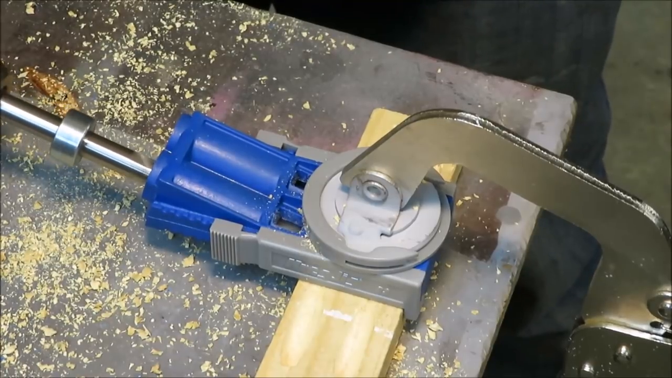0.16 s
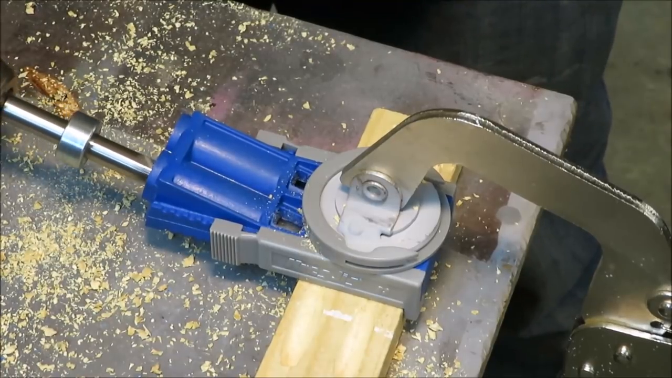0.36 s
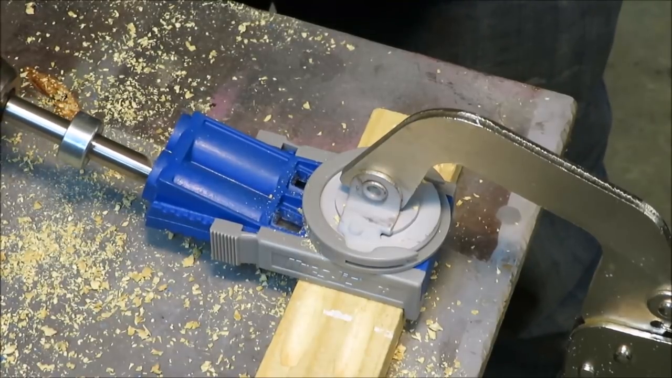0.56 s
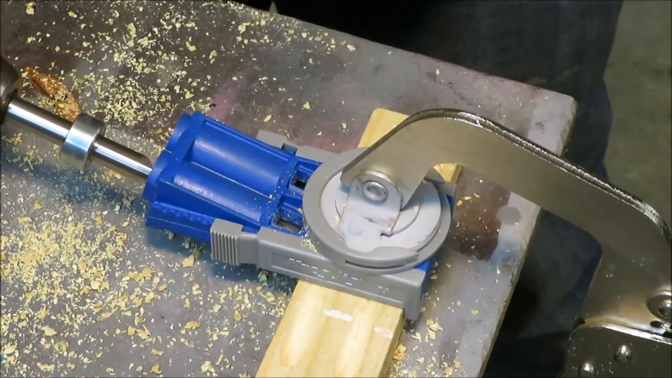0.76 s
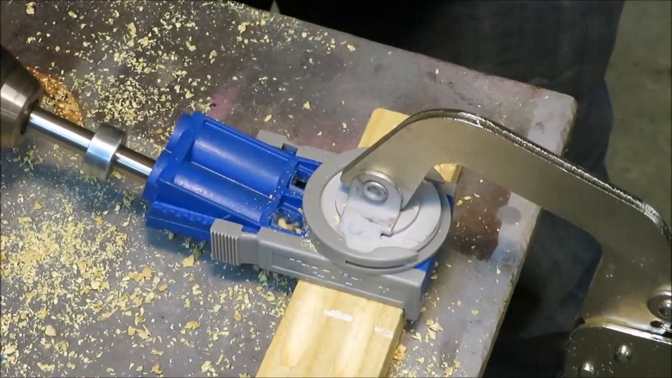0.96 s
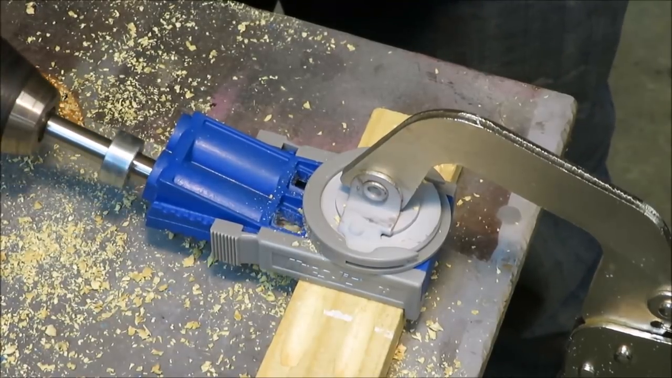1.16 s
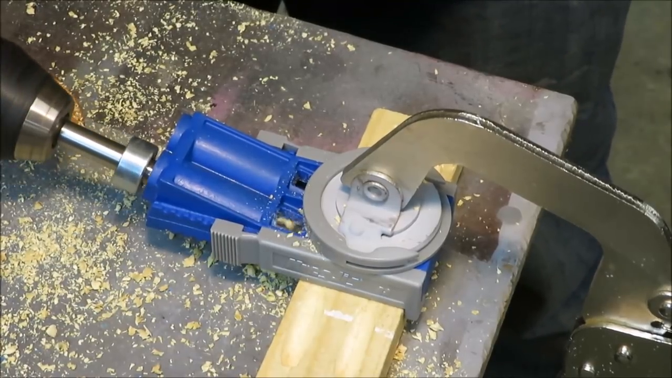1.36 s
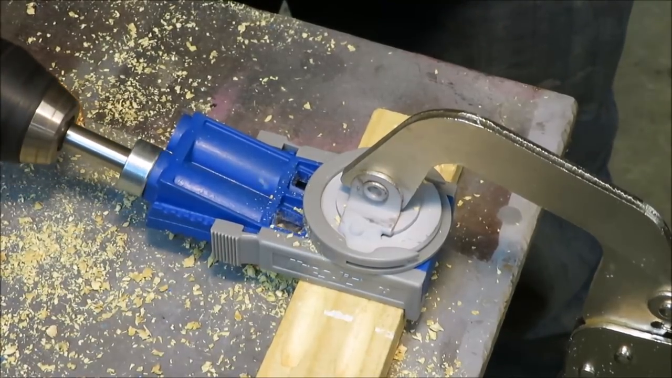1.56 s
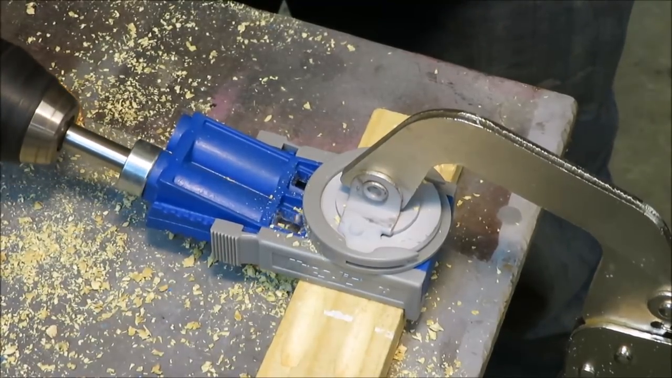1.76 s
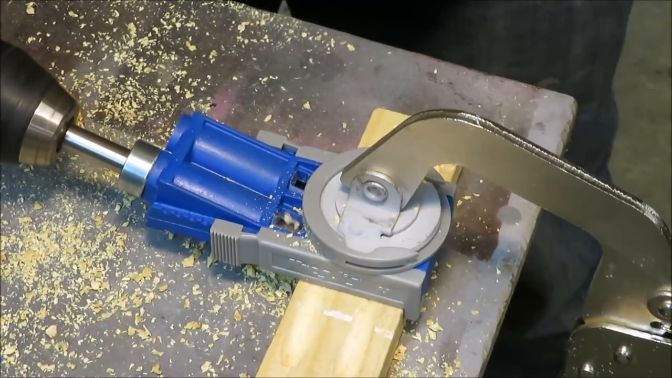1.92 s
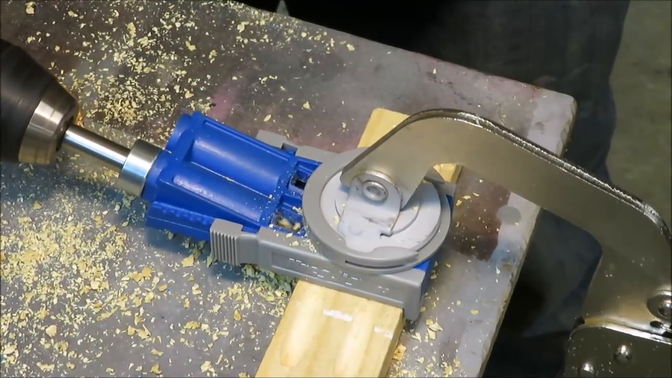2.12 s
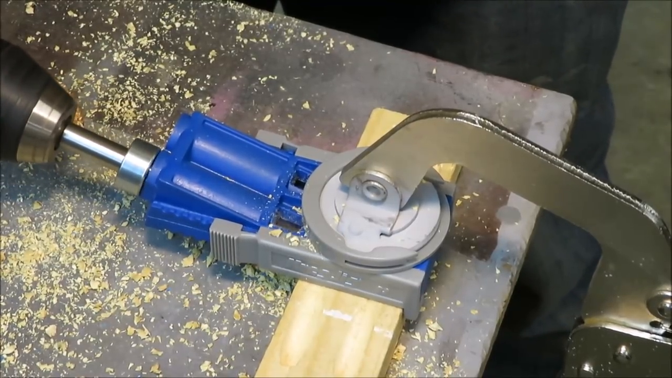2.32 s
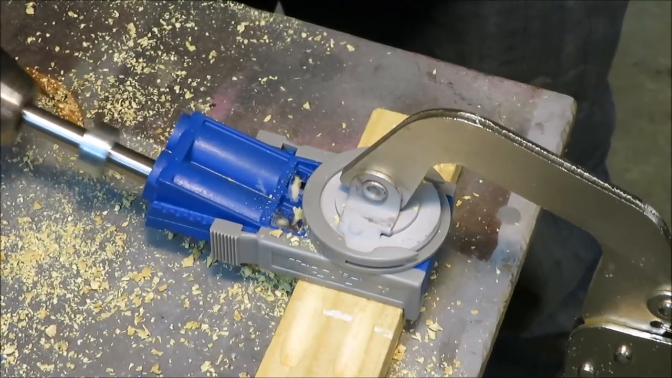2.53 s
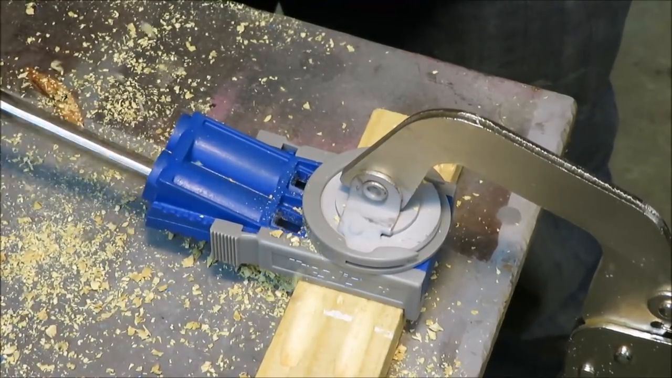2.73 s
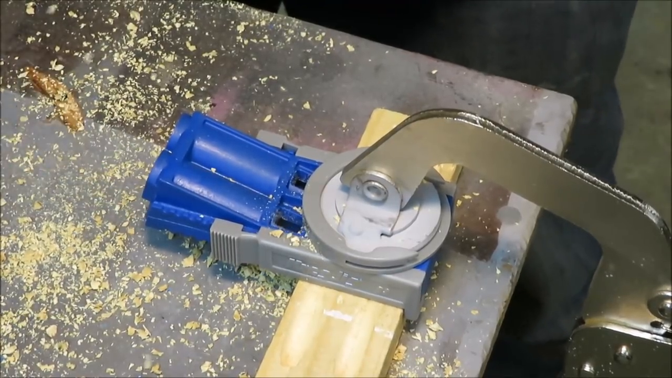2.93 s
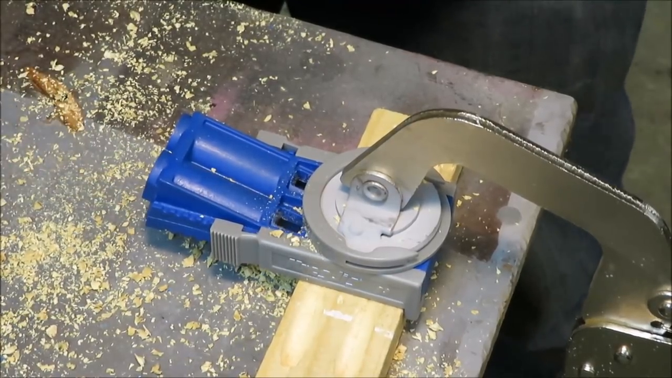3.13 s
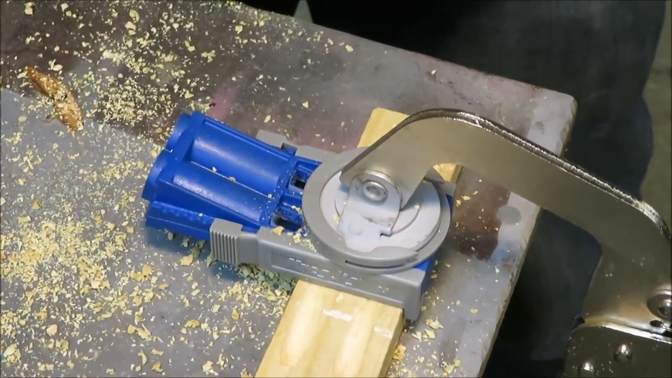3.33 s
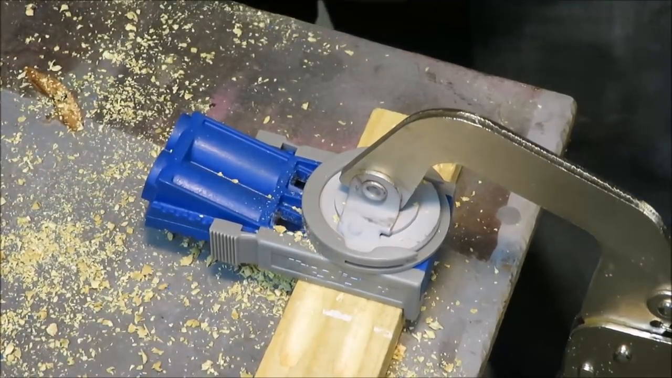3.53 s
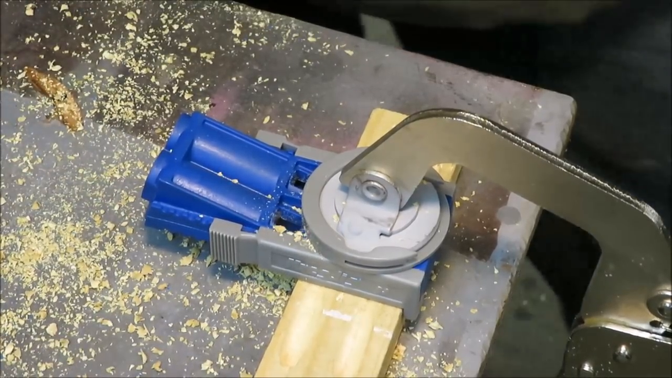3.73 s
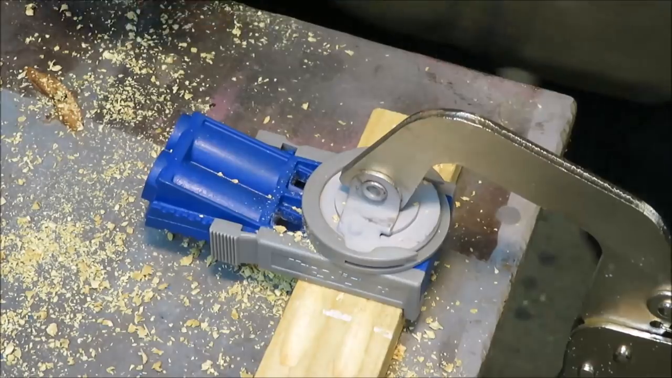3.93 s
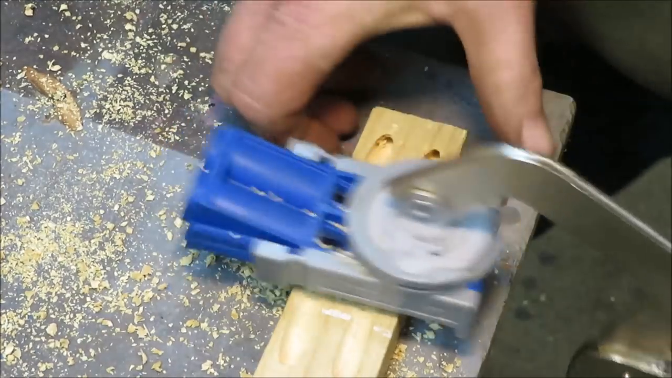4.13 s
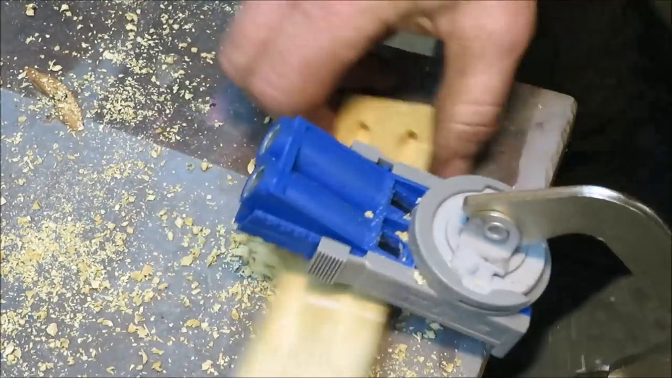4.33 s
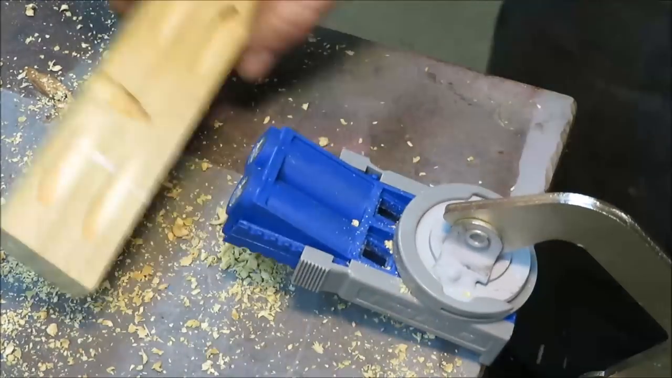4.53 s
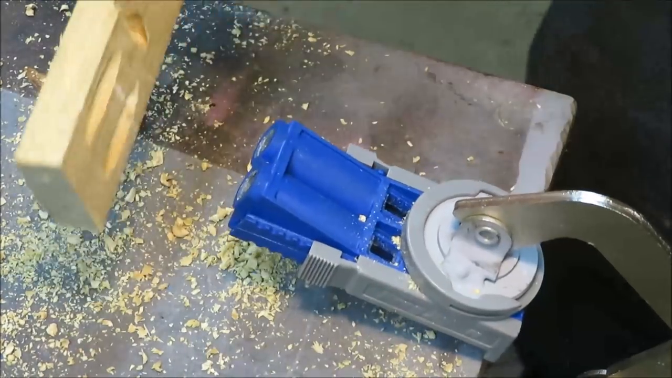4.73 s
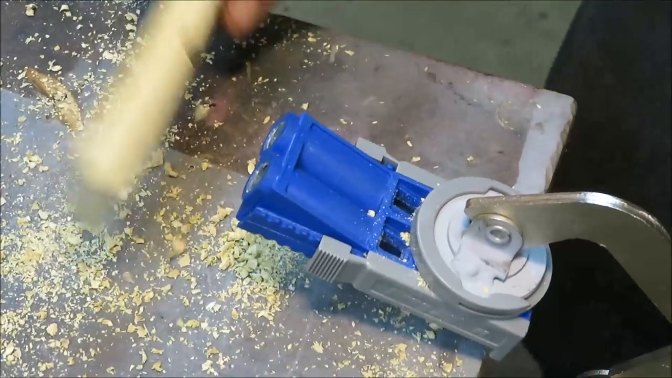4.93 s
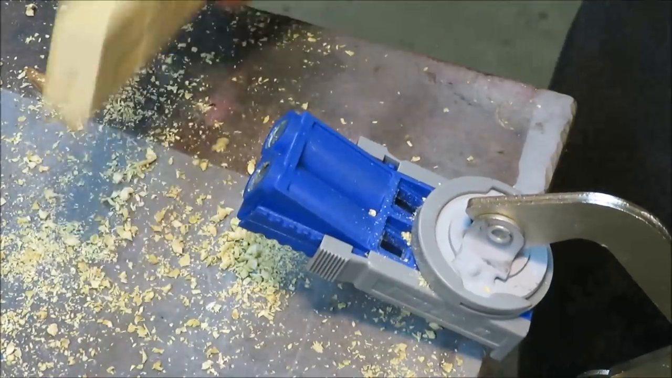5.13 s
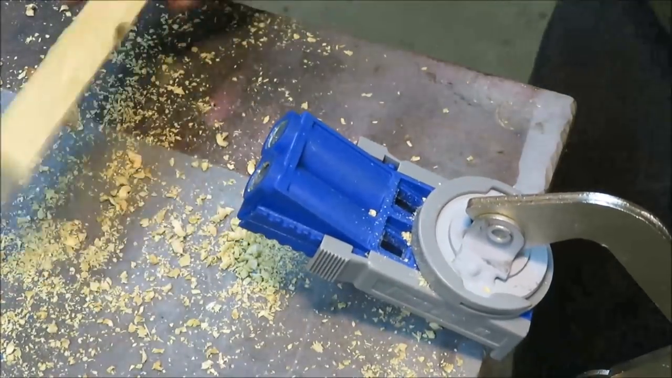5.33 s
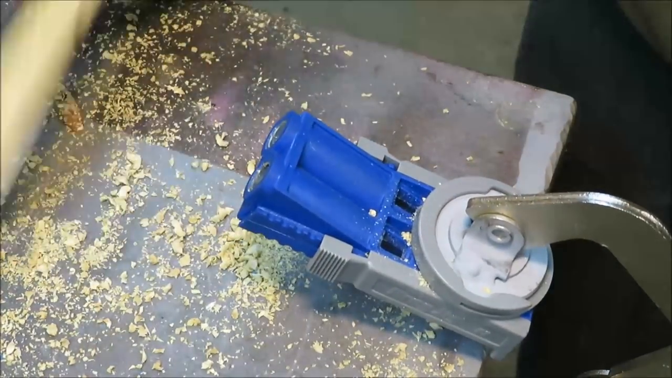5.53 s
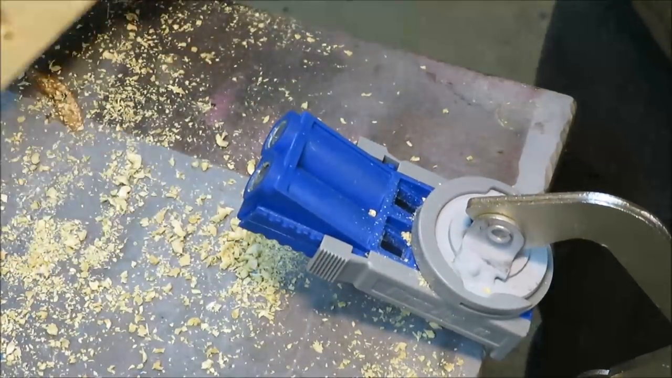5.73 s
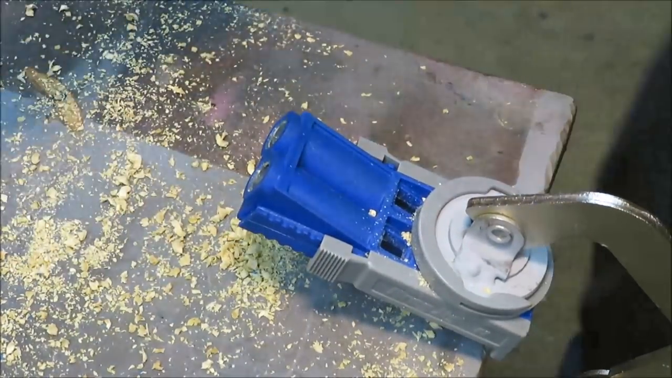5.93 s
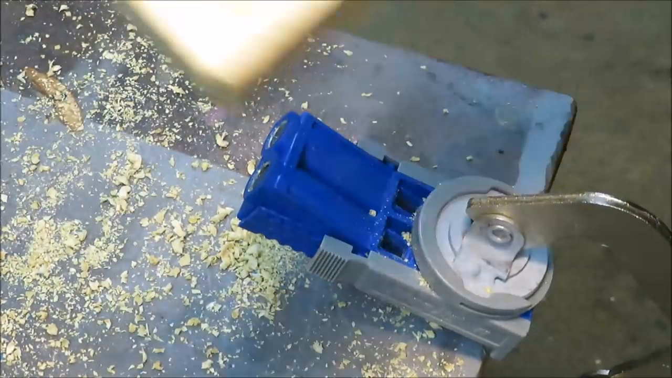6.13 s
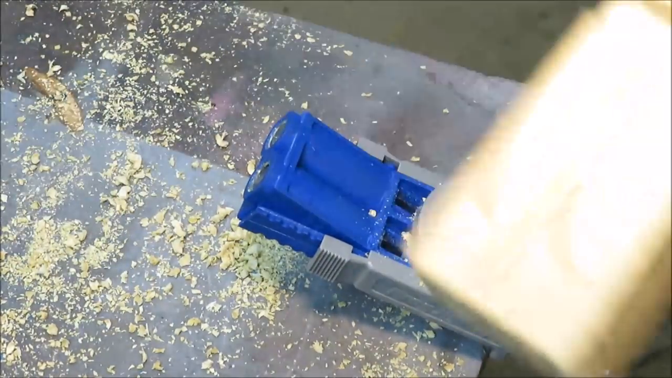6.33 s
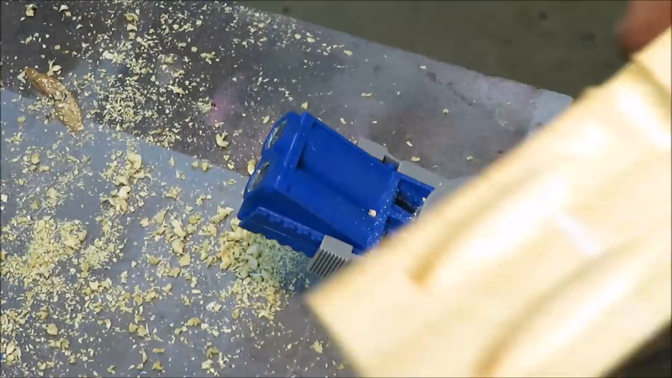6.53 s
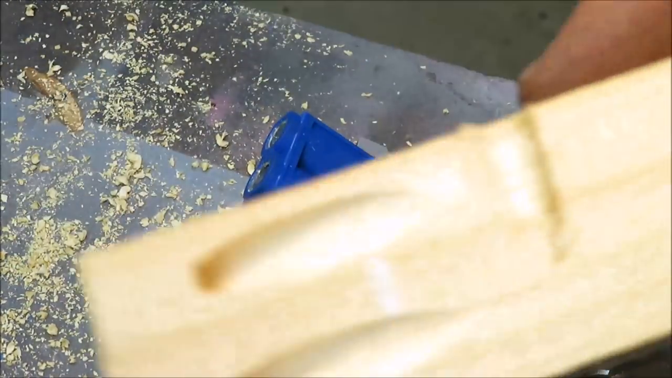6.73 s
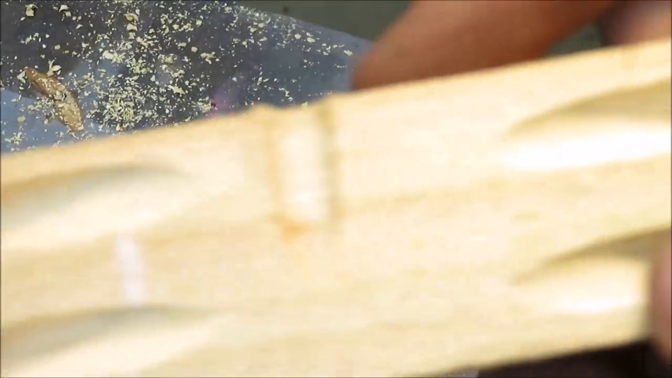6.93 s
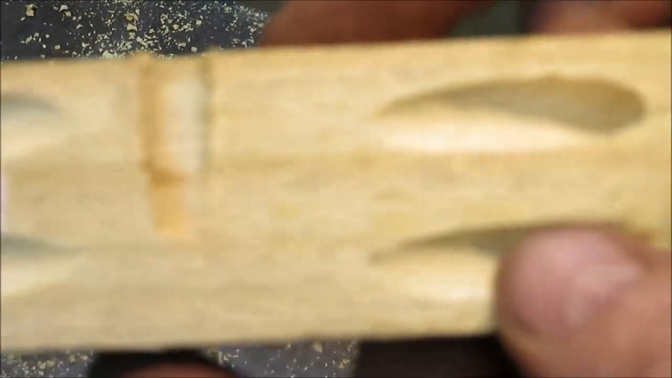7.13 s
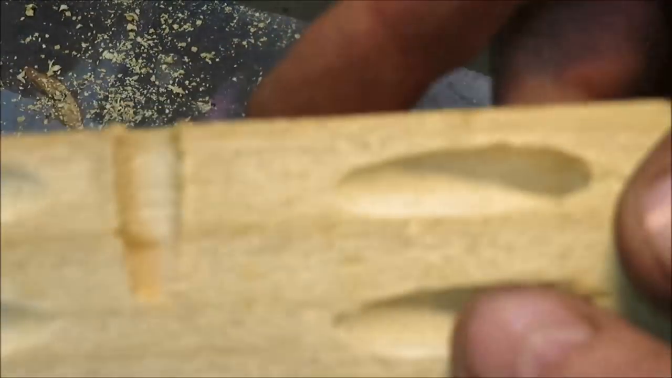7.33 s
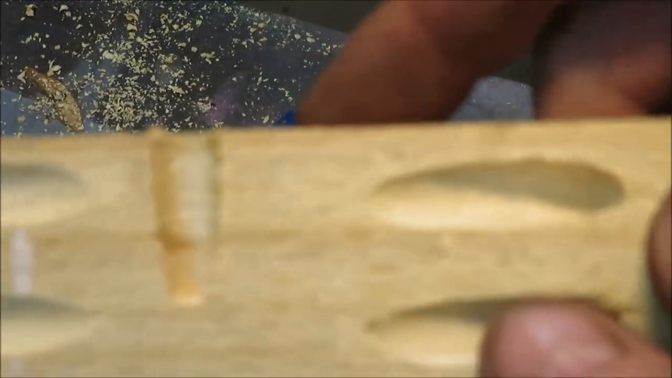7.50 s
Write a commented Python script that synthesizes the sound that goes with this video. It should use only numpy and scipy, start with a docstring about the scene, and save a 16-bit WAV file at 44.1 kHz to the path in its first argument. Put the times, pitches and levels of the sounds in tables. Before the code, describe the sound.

In a workshop, a cordless drill already running bores into a clamped board, its whine sagging under load with rough wood tearing, then recovering and braking with a hard clack. The drill thumps onto the bench, a clamp snaps open with plastic clatter, the board knocks six times, and fingers softly stroke it. Close stereo microphones, modest room echo.

```python
"""Workshop, close pair of microphones: a cordless drill bores a pocket hole through a clamped jig, bogs down
in the wood, backs out and brakes with a clack. It is set down on the bench, the clamp snaps open, the board
is knocked six times to shed its chips, then turned over in the hands. The motor is tones locked to a shaft
angle plus coloured noise and grains; blows ring decaying modes under short noise cracks; friction is
coloured grains under gesture envelopes. A synthetic diffuse echo surrounds the sources."""
import sys
import numpy as np
from scipy import signal
from scipy.fft import rfft, irfft
from scipy.io import wavfile
from scipy.ndimage import uniform_filter1d

SR = 44100
rng = np.random.default_rng(int(sys.argv[2]) if len(sys.argv) > 2 else 0)


def digitize_waveform(pressure):
    """Quantize a signal to 16-bit integers and store it at the path in sys.argv[1].

    Rows of a 2-D input are taken as channels; values are limited to [-1, 1].
    """
    field = np.atleast_2d(pressure).T
    bounded = np.clip(field, -1, 1)
    quanta = np.round(bounded * 32767).astype(np.int16)
    wavfile.write(sys.argv[1], SR, quanta)


N = 333524
TIME_S = np.arange(N) / SR


def undb(db):
    """Convert decibels to amplitude gain."""
    return 10 ** (np.asarray(db) / 20)


def unit(x):
    """Scale to rms 1."""
    return x / np.sqrt(np.mean(x ** 2))


def curve(rows):
    """Interpolate (s, value) rows at every sample."""
    return np.interp(TIME_S, *np.transpose(rows))


def across(points, hz):
    """Interpolate (Hz, value) points on a logarithmic frequency axis."""
    point_hz, value = np.transpose(points)
    return np.interp(np.log(hz + 1), np.log(point_hz + 1), value)


def colour(x, points):
    """Filter by a (Hz, dB) spectrum with zero phase."""
    gain = undb(across(points, np.fft.rfftfreq(len(x), 1 / SR)))
    return irfft(rfft(x) * gain, len(x))


def walk(rate_hz):
    """Random levels, each held 1 / rate_hz, smoothed twice, rms 1."""
    hold = max(int(SR / rate_hz), 2)
    steps = np.repeat(rng.standard_normal(N // hold + 1), hold)
    slewed = uniform_filter1d(uniform_filter1d(steps, hold), hold)
    return unit(slewed[:N])


def grains(rate_hz, spread_db):
    """Tiny clicks at random moments, a few far stronger than the rest, rms 1."""
    hits = rng.random(N) < rate_hz / SR
    strength = rng.standard_normal(N) * undb(spread_db * rng.exponential(size=N))
    return unit(hits * strength)


def gesture(start_s, length_s, attack_s, release_s):
    """Envelope of one movement: linear rise, hold at 1, exponential decay."""
    age_s = TIME_S - start_s
    return np.clip(age_s / attack_s, 0, 1) * np.exp(-np.maximum(age_s - length_s, 0) / release_s)


def after(moment_s, change_s=0.03):
    """Smooth change from 0 to 1 around a moment."""
    return .5 + .5 * np.tanh((TIME_S - moment_s) / change_s)


def resonate(x, resonances):
    """Sum of parallel resonant band-passes, given as (Hz, width Hz, dB)."""
    return sum(undb(db) * signal.lfilter(*signal.iirpeak(hz, hz / width_hz, fs=SR), x)
               for hz, width_hz, db in resonances)


def strike(blows, modes, crack_colour, ring_db, crack_db, crack_s, dense=.5, dense_s=.006, scatter_db=5.0):
    """Each blow rings an object's modes and adds a short crack; softer contact excites high modes less."""
    out, t = np.zeros(N + SR), TIME_S[:SR // 2]
    hz, db, t60_s = np.transpose(modes)
    # slow motion hardly radiates
    radiation = signal.butter(2, hz[0] / np.sqrt(2), "high", fs=SR, output="sos")
    decay = np.exp(-np.log(1000) * np.outer(1 / t60_s, t))
    sign = (-1) ** np.arange(len(hz))  # neighbouring modes swing in opposite directions
    fill = rng.standard_normal(len(t))  # the object's own weak modes, same for every blow
    for start_s, blow_db, tick_db, contact_hz in blows:
        scattered_db = db + scatter_db * rng.standard_normal(len(hz))
        gain = undb(scattered_db) / (1 + (hz / contact_hz) ** 2)
        gain = gain / np.linalg.norm(gain)
        pitch_hz = hz * (1 + .008 * rng.standard_normal(len(hz)))
        ring = (gain * sign) @ (np.sin(2 * np.pi * np.outer(pitch_hz, t)) * decay)
        # many weak, well-damped modes fill the gaps between the strong ones
        outline_hz = np.r_[hz[0] / 2, hz, 2 * hz[-1]]
        outline_db = 20 * np.log10(np.r_[.01, gain, .003])
        weak_modes = unit(colour(fill, np.c_[outline_hz, outline_db]))
        onset = 1 - np.exp(-2 * contact_hz * t)
        ring += dense * weak_modes * np.exp(-t / dense_s) * onset
        crack = unit(colour(rng.standard_normal(len(t)), crack_colour)) * np.exp(-t / crack_s)
        blow = undb(blow_db + ring_db) * ring + undb(tick_db + crack_db) * crack
        start = int(start_s * SR)
        out[start:start + len(t)] += signal.sosfilt(radiation, blow)
    return out[:N]


# Spectrum of the workshop air and sleeves. Each row: frequency in Hz, relative level in dB.
AIR_COLOUR_DB = [(20, -30.5), (60, -8), (140, -3.5), (330, -2), (580, -8), (900, -11), (2200, -14.5),
                 (4000, -24), (9000, -34), (15000, -41)]
# Width of diffuse sound. Each row: frequency in Hz, side minus mid in dB.
ROOM_SIDE_DB = [(200, -33), (700, -21), (2200, -17), (3200, -12), (4700, -3), (9000, 0)]
# Sleeves rustle while the arms move. Each row: start in seconds, length in seconds, level in dB.
ARM_MOVES = [(3.287, 2.3, -48.5), (6.823, 2, -48.5)]


def background(air_db=-59, attack_s=0.77, release_s=0.22):
    """Quiet workshop air as coloured noise, raised to a soft low rustle by moving sleeves."""
    mid, side = (unit(colour(rng.standard_normal(N), AIR_COLOUR_DB)) for _ in range(2))
    side = colour(side, ROOM_SIDE_DB)
    sleeves = sum(undb(db) * gesture(start_s, length_s, attack_s, release_s)
                  for start_s, length_s, db in ARM_MOVES)
    level = np.hypot(undb(air_db), sleeves) * undb(0.72 * walk(9.9))
    return np.array([mid + side, mid - side]) * level


def drill(stop_s=2.897, fade_s=0.0047):
    """Whine, boring noise and shudder share one shaft and end together when the brake bites."""
    angle = motor_angle()
    running = np.clip((stop_s - TIME_S) / fade_s + 1, 0, 1)
    return running * whine(angle), running * boring(angle), running * shudder(angle)


# Motor speed, sagging under the push and recovering on backing out.
# Each row: time in seconds, speed in Hz (turns per second).
SPEED_HZ = [(0.0, 322.8), (0.26, 321.8), (0.44, 320), (0.76, 319.5), (0.86, 319.4), (0.94, 308.8),
            (1.08, 303.6), (1.16, 306.9), (1.24, 286.2), (1.28, 289), (1.34, 300.7), (1.52, 292.8),
            (1.62, 306.6), (1.8, 311.8), (2.6, 318.5), (2.78, 325.7), (2.88, 319)]


def motor_angle():
    """Shaft angle in radians: integral of the loaded speed with slight wobble and flutter."""
    hz = curve(SPEED_HZ) * (1 + .0016 * walk(30) + .0022 * walk(300))
    return 2 * np.pi * np.cumsum(hz) / SR


def sag_hz(free_hz=325):
    """Load on the motor, as the speed that it loses."""
    return free_hz - curve(SPEED_HZ)


def feed(start_s=.17, end_s=1.62):
    """1 while the bit is pushed into the wood, until its collar meets the jig; 0 before and after."""
    return after(start_s) - after(end_s)


# Tones of fan, commutator and gears.
# Each row: multiple of motor speed [1], relative level in dB, change while the bit is pushed in dB.
MOTOR_ORDERS = [(1, -44, 0), (1.305, -34.5, -.5), (2, -40, 0), (3, -39, -1.5), (4, -41, -1.5),
                (5, -27.5, -2.5), (6.53, -35.5, -8), (9.79, -42, -2), (12, -38.5, -5.5), (12.58, -42, -2),
                (12.73, -44, -2), (22, -42, -6), (25, -43, 0), (27, -46, -2), (30, -44, -2),
                (32, -42.5, -2), (35, -45.5, -2)]
# Housing resonances that lift passing tones. Each row: centre in Hz, half width in Hz, lift in dB.
HOUSING = [(3830, 140, 7.5), (7400, 350, 8)]


def housing_lift_db(tone_hz):
    """Gain of a tone gliding through the housing resonances."""
    return sum(db / (1 + ((tone_hz - hz) / half_width_hz) ** 2) for hz, half_width_hz, db in HOUSING)


def whine(angle, free_db=1.06, db_per_sag_hz=0.0157, waver_db=2.0, buzz_db=-40):
    """Motor tones locked to the shaft; the brushes scrape the same uneven track on every turn."""
    speed_hz, pushed = curve(SPEED_HZ), feed()
    tones = np.zeros(N)
    for order, db, push_db in MOTOR_ORDERS:
        level_db = db + housing_lift_db(order * speed_hz) + push_db * pushed + waver_db * walk(25.42)
        tones += undb(level_db) * np.sqrt(2) * np.sin(order * angle + 2 * np.pi * rng.random())
    track = signal.resample(rng.standard_normal(96), 1024)
    track_angle = np.linspace(0, 2 * np.pi, len(track), endpoint=False)
    buzz = unit(np.interp(angle, track_angle, track, period=2 * np.pi))
    return undb(free_db + db_per_sag_hz * sag_hz()) * tones + undb(buzz_db) * buzz


# Flutes catch on fibres and chips.
# Each row: start in seconds, length in seconds, extra cutting level in dB.
CATCHES = [(0.324, 0.16, 4), (0.829, 0.26, 3), (1.155, 0.052, 5), (2.611, 0.06, 7)]


def catch_db():
    """Extra cutting level while the flutes catch."""
    return sum(db * gesture(start_s, length_s, attack_s=.015, release_s=.015)
               for start_s, length_s, db in CATCHES)


# Spectrum of torn wood fibres. Each row: frequency in Hz, relative level in dB.
CUT_COLOUR_DB = [(30, -40.5), (55, -29), (80, -9), (150, -3), (280, -2.5), (400, 2), (520, -2), (700, -2),
                 (900, -1.5), (1100, -8.5), (1500, -10), (2500, -10), (6000, -22)]
# Spectrum of brush and fan hiss. Each row: frequency in Hz, relative level in dB.
RUSH_COLOUR_DB = [(500, -26), (1200, -1.5), (1700, 4.5), (2100, 4.5), (2400, -2), (3100, 3), (3500, -2),
                  (4050, 6), (4900, -2.5), (6500, -3), (7400, -0.5), (10300, -1), (13000, -3.5),
                  (15500, -15)]
GEAR_RATIO = 14  # motor turns per chuck turn
# Levels at the free speed, and their change per Hz of sag.
CUT_FREE_DB, CUT_DB_PER_SAG_HZ = -25.5, 0.0741
RUSH_FREE_DB, RUSH_DB_PER_SAG_HZ = -19, -0.0555
BIT_OUT_S, BIT_OUT_DB = 2.62, -2.5  # bit slips out of the guide, hiss drops


def boring(angle, brush_depth=0.17, bite_depth=0.2):
    """Brush and fan hiss pulses with each motor turn; flutes tear fibres as grains, harder under load."""
    pulse = (1 + brush_depth * np.sin(angle)) * undb(1.0 * walk(90))
    rush = unit(colour(rng.standard_normal(N) * pulse, RUSH_COLOUR_DB))
    bite = 1 + bite_depth * np.sin(2 * angle / GEAR_RATIO)  # two flutes per chuck turn
    cutting = unit(colour(grains(7000, 1.6) * bite * undb(0.56 * walk(35.005)), CUT_COLOUR_DB))
    cut_db = CUT_FREE_DB + CUT_DB_PER_SAG_HZ * sag_hz() + catch_db()
    rush_db = RUSH_FREE_DB + RUSH_DB_PER_SAG_HZ * sag_hz() + BIT_OUT_DB * after(BIT_OUT_S)
    return undb(rush_db) * rush + undb(cut_db) * cutting


# Resonances of the clamped board. Each row: centre in Hz, width in Hz, relative level in dB.
SHUDDER = [(238.6, 16, -5.5), (409.5, 31, 0), (498.5, 19, -11.5), (635, 17, -8), (885, 21, -15)]


def shudder(angle, level_db=-29.5, slip_turns=.2, scatter_db=2.5, catch_share=0.5):
    """About once a chuck turn the bit grabs, unevenly, and shakes the board; most when flutes catch."""
    chuck_turns = angle / (2 * np.pi * GEAR_RATIO) + slip_turns * walk(25)
    whole_turns = np.floor(np.maximum.accumulate(chuck_turns))
    grabs = np.diff(whole_turns, prepend=whole_turns[0]) * undb(scatter_db * rng.standard_normal(N))
    return undb(level_db + catch_share * catch_db()) * unit(resonate(grabs, SHUDDER))


# Brake clacks. Each row: start in seconds, relative ring in dB, relative crack in dB, contact corner in Hz.
BRAKE_BLOWS = [(2.8942, 3, -16.5, 6000), (2.898, -1.5, -13, 6010), (2.910, -21, -20, 6000),
               (2.919, -12, -22, 6050)]
# Gearbox modes. Each row: frequency in Hz, relative level in dB, t60 in seconds.
GEARBOX_MODES = [(413, -8.5, .04), (953, -10.5, 0.017), (1559, 3, 0.012), (2070, -6, .02), (2920, 4, 0.008),
                 (3850, 1.5, 0.018)]
# Clack spectrum. Each row: frequency in Hz, relative level in dB.
CLACK_COLOUR_DB = [(120, -39.5), (200, -8), (1020, -9.5), (1490, 2), (2800, -10.5), (4310, -0.5),
                   (6190, -10), (7280, -11), (11400, -8), (15000, -25.5)]


def brake_clack():
    """The brake knocks the gearbox into short, well-damped ringing."""
    return strike(BRAKE_BLOWS, GEARBOX_MODES, CLACK_COLOUR_DB, ring_db=-13.0, crack_db=5.5, crack_s=0.0034,
                  dense=0.71, dense_s=.004)


# Chuck taps. Each row: start in seconds, relative ring in dB, relative crack in dB, contact corner in Hz.
CHUCK_TAPS = [(3.213, -13.5, -29, 4040), (3.2155, -35.5, -14.5, 6000)]
# Chuck modes. Each row: frequency in Hz, relative level in dB, t60 in seconds.
CHUCK_MODES = [(237, -2, .13), (301, -7, .15), (700, -1, .14), (790, 1, .04), (1320, -8, .02),
               (1868, -8, .17)]
# Snap spectrum of chuck, clamp and lever. Each row: frequency in Hz, relative level in dB.
SNAP_COLOUR_DB = [(600, 12.5), (1300, -2), (2000, 0.5), (2900, 4), (4800, -6.5), (7600, -5.5), (9300, -5.5),
                  (12000, -4), (15000, -8)]


def chuck_taps():
    """The chuck taps down first and rings its modes."""
    return strike(CHUCK_TAPS, CHUCK_MODES, SNAP_COLOUR_DB, ring_db=-4.5, crack_db=0, crack_s=0.0011,
                  dense=0.51, dense_s=0.012, scatter_db=1.5)


# Drill and board thump on the bench.
# Each row: start in seconds, relative ring in dB, relative crack in dB, contact corner in Hz.
BENCH_THUMPS = [(3.3705, -1.5, -28.5, 707), (3.389, -8, -28, 800), (3.431, -5.5, -27.5, 1090),
                (3.461, -15.5, -27.5, 400), (3.525, -19.5, -35.5, 299), (4.168, -17.5, -42, 703),
                (4.226, -16, -40, 900), (4.436, -12.5, -31.5, 301), (4.734, -16.5, -47, 249.2),
                (6.838, -41.5, -73, 249)]
# Bench modes. Each row: frequency in Hz, relative level in dB, t60 in seconds.
BENCH_MODES = [(82.6, -8.5, 0.19), (110, -5.5, 0.15), (137, -2, 0.19), (195, 0, 0.083), (236, -2, .07),
               (285, 4, .085), (352, -1.5, .06), (393, -2, 0.066), (504, -4, 0.072), (702, -8, .06)]
# Thump crack spectrum. Each row: frequency in Hz, relative level in dB.
THUMP_COLOUR_DB = [(410, -34.5), (700, -1), (1150, -8.5), (1670, -9), (2000, -13), (2560, -13.5),
                   (2980, -21), (15000, -37.5)]


def bench_thumps():
    """Drill and board excite the low modes of the bench."""
    return strike(BENCH_THUMPS, BENCH_MODES, THUMP_COLOUR_DB, ring_db=-4, crack_db=1.5, crack_s=0.038,
                  dense=0.41, dense_s=0.03, scatter_db=1.5)


# Jig clatter. Each row: start in seconds, relative ring in dB, relative crack in dB, contact corner in Hz.
JIG_BLOWS = [(3.3705, -19, -28.5, 3000), (4.1635, -5, -19.5, 3005), (4.170, -3.5, -21.5, 3020),
             (4.216, -11.5, -23, 3000), (4.222, -6.5, -24, 3000), (4.238, -14, -25.5, 2990),
             (4.262, -18, -22.5, 2973), (4.271, -13, -20, 3010), (4.300, -16.5, -22, 2990),
             (4.428, -13.5, -16, 3000), (4.447, -12.5, -22.5, 3020), (4.4665, -15.5, -15.5, 3000),
             (4.4705, -12.5, -18, 3010), (7.247, -41, -60, 3000)]
# Jig modes. Each row: frequency in Hz, relative level in dB, t60 in seconds.
JIG_MODES = [(340, -8.5, 0.06), (430, -1, 0.075), (560, -1.5, 0.071), (720, -6.5, 0.043), (810, -.5, 0.06),
             (1202, 1, 0.058), (1310, -2, .03), (1780, -6, 0.035), (2700, -7, .022)]
# Crack spectrum of jig and board. Each row: frequency in Hz, relative level in dB.
CRACK_COLOUR_DB = [(500, -12), (1200, 13), (2700, 9.5), (4000, -1.5), (6000, -5.5), (9000, -39.5),
                   (15000, -45.5)]


def jig_clatter():
    """The plastic jig clatters on damped mid-frequency modes."""
    return strike(JIG_BLOWS, JIG_MODES, CRACK_COLOUR_DB, ring_db=-6.5, crack_db=1.5, crack_s=0.0029,
                  dense=0.48, dense_s=0.0079)


# Resonances of jig and clamp. Each row: centre in Hz, width in Hz, level in dB.
SYMPATHY = [(393, 9, -13), (572, 6, -5), (827, 14, -8.5), (866, 6, -6.5), (1283, 24, -7), (1704, 26, -1.5),
            (1770, 20, -3.5)]


def sympathy(blows):
    """Jig and clamp sing along with the jig clatter and board knocks through narrow resonances."""
    return resonate(blows, SYMPATHY)


# Lever chinks. Each row: start in seconds, relative ring in dB, relative crack in dB, contact corner in Hz.
LEVER_CHINKS = [(3.378, -30.5, -25.5, 15000), (3.392, -31.5, -25, 15000), (3.570, -41, -29.5, 15000),
                (3.696, -51.5, -34.5, 14900), (4.711, -35.5, -38.5, 2510), (4.749, -22, -17.5, 15070),
                (4.756, -29.5, -20, 15000)]
# Lever modes. Each row: frequency in Hz, relative level in dB, t60 in seconds.
LEVER_MODES = [(4130, -8, .13), (6200, -15.5, .12), (7760, -12.5, .14), (10750, -5, 0.24),
               (10760, -2.5, .16)]


def lever_chinks():
    """The clamp's loose lever chinks when jolted, on long high modes."""
    return strike(LEVER_CHINKS, LEVER_MODES, SNAP_COLOUR_DB, ring_db=-7.5, crack_db=3.0, crack_s=0.0019,
                  dense=0.45, dense_s=0.031, scatter_db=1.5)


# Rattles of loose metal parts. Each row: start in seconds, length in seconds, level in dB.
RATTLES = [(3.388, 0.09, -39.5), (4.173, 0.14, -40.5), (4.426, 0.042, -38)]
# Rattle spectrum. Each row: frequency in Hz, relative level in dB.
CHATTER_COLOUR_DB = [(400, -23.5), (900, -2.5), (1600, 1.5), (2400, 0.5), (3500, -6.5), (5000, -14.5),
                     (9000, -17.5), (15000, -23.5)]


def rattle():
    """Loose metal parts tick unevenly after the drill lands and while the clamp falls open."""
    tick = rng.standard_normal(400) * np.exp(-TIME_S[:400] / .001)
    ticks = signal.fftconvolve(grains(260, 2.2), tick)[:N]
    level = sum(undb(db) * gesture(start_s, length_s, attack_s=.01, release_s=0.023)
                for start_s, length_s, db in RATTLES)
    return level * unit(colour(ticks, CHATTER_COLOUR_DB))


# Drill and board slide over the bench. Each row: start in seconds, length in seconds, level in dB.
SLIDES = [(3.424, 0.18, -35.5), (4.173, 0.14, -29), (4.41, 0.098, -32.5), (4.72, 0.093, -36)]
# Scrape spectrum. Each row: frequency in Hz, relative level in dB.
SCUFF_COLOUR_DB = [(90, -18.5), (200, -4.5), (430, 6.5), (800, -2.5), (1300, -9), (1700, -9), (2700, -12.5),
                   (4500, -22), (9000, -28), (15000, -36)]


def bench_slides():
    """Drill and board scrape over the bench as dense, uneven grains."""
    scrape = unit(colour(grains(5000, 2.) * undb(2.2 * walk(70)), SCUFF_COLOUR_DB))
    level = sum(undb(db) * gesture(start_s, length_s, attack_s=0.023, release_s=0.06)
                for start_s, length_s, db in SLIDES)
    return level * scrape


# Steel clicks. Each row: start in seconds, relative ring in dB, relative crack in dB, contact corner in Hz.
CLAMP_CLICKS = [(4.110, -45, -41.5, 3010), (4.131, -36.5, -28, 15000), (4.1358, -6.5, -4, 15000),
                (4.1378, -20.5, -11, 14800), (4.174, -23, -21.5, 8950), (4.222, -27.5, -26, 8990),
                (4.260, -22, -22, 7100), (4.272, -25, -17, 7020), (4.284, -34, -27, 7000),
                (4.298, -34, -27, 4000), (4.447, -33, -21.5, 6000), (4.466, -18, -20.5, 4000)]
# Clamp modes. Each row: frequency in Hz, relative level in dB, t60 in seconds.
CLAMP_MODES = [(1280, -11.5, 0.064), (1534, -13, .05), (2830, 0, .02), (3860, -10, .04), (6340, -11.5, .02),
               (8250, -4.5, 0.031), (9000, -4, .08), (9760, -5.5, .14), (9900, -2.5, .1), (12500, -7, .05),
               (14500, -7, .05)]


def clamp_snap():
    """The steel clamp snaps open in clicks that ring high modes."""
    return strike(CLAMP_CLICKS, CLAMP_MODES, SNAP_COLOUR_DB, ring_db=-7.5, crack_db=-1.5, crack_s=0.0017,
                  dense=0.53, dense_s=0.013, scatter_db=1.0)


# Board knocks; a flatter, softer blow is duller.
# Each row: start in seconds, relative ring in dB, relative crack in dB, contact corner in Hz.
BOARD_KNOCKS = [(4.9238, 3, -17, 3800), (5.0997, -1.5, -24.5, 3200), (5.2857, -4, -23.5, 3600),
                (5.4385, -6, -31, 900), (5.6213, -3, -36.5, 3800), (5.788, -11.5, -35, 1690)]
# Board modes. Each row: frequency in Hz, relative level in dB, t60 in seconds.
BOARD_MODES = [(176, -21.5, 0.059), (388, -10, 0.07), (591, -3, 0.058), (743, -5.5, 0.04), (870, -7, 0.039),
               (961, -3, 0.03), (1054, -4, 0.026), (1264, -1.5, 0.03), (1520, -4, 0.011), (1640, -6, 0.018),
               (1798, -8, 0.025), (1984, -11, 0.024), (2580, -13.5, .016), (2950, -19, .014)]


def board_knocks():
    """The board is knocked on the bench and rings its quickly damped wood modes."""
    return strike(BOARD_KNOCKS, BOARD_MODES, CRACK_COLOUR_DB, ring_db=3.5, crack_db=6.5, crack_s=0.0032,
                  dense=0.53, dense_s=0.0055, scatter_db=1.5)


# Fingers stroke the board.
# Each row: start in seconds, length in seconds, attack in seconds, level in dB, treble tilt in dB.
STROKES = [(6.3, 0.032, .04, -64, 12), (6.387, 0.058, .04, -45, -5.5), (6.56, 0.052, .05, -60.5, 0),
           (6.786, 0.21, 0.069, -59, 7), (7.0, 0.14, 0.12, -63.5, 16)]
# Spectrum of skin on wood. Each row: frequency in Hz, relative level in dB.
RUB_COLOUR_DB = [(60, -14), (150, -4), (400, 0), (750, -3.5), (1750, -9), (2200, -3.5), (2700, -8.5),
                 (4500, -16.5), (7500, -17.5), (12000, -18), (15000, -25)]


def finger_strokes():
    """Fingers slide over the grain as coloured grains, each stroke with its own treble."""
    rub = unit(colour(grains(7000, 1.8) * undb(2 * walk(45)), RUB_COLOUR_DB))
    strokes = np.zeros(N)
    for start_s, length_s, attack_s, db, treble_db in STROKES:
        tilted = colour(rub, [(3000, 0), (7000, treble_db)])
        strokes += undb(db) * gesture(start_s, length_s, attack_s, release_s=0.042) * tilted
    return strokes


# Full phase lead of the left microphone for sound from the left. Each row: frequency in Hz, lead in radians.
PORT_PHASE_RAD = [(1000, 0), (3000, 0), (4200, .45), (5500, .4), (7600, 1.3), (10300, 1.5), (15000, 2.8)]


def ports(x, leftness):
    """A source off to one side reaches the nearer microphone slightly first, as a treble phase lead."""
    lead_rad = leftness * across(PORT_PHASE_RAD, np.fft.rfftfreq(N, 1 / SR))
    turn = np.exp(.5j * lead_rad)
    return irfft(rfft(x) * np.array([turn, turn.conj()]), N)


def glance(x, level_db, decay_s):
    """Treble bounces off nearby surfaces, unlike at the two microphones, and widens the direct sound."""
    bounce = rng.standard_normal(4096) * np.exp(-TIME_S[:4096] / decay_s)
    bounced = signal.fftconvolve(x, bounce / np.linalg.norm(bounce))[:N]
    side = colour(bounced, ROOM_SIDE_DB)
    return undb(level_db) * np.array([side, -side])


# Echo decay. Each row: frequency in Hz, t60 in seconds.
ROOM_T60_S = [(80, 1), (260, 0.87), (700, 0.6551), (1800, 0.69), (5000, 0.62), (14000, 0.23)]
# Echo spectrum. Each row: frequency in Hz, level in dB.
ROOM_COLOUR_DB = [(60, -12.5), (200, -5.5), (400, -1), (1050, -2.5), (2100, -5), (5000, -6.5),
                  (14000, -7.5)]


def workshop(x, build_s=0.011):
    """Diffuse echo that builds up and dies band by band; mostly its treble differs between microphones."""
    t, hz = TIME_S[:SR], np.arange(SR // 2 + 1.)
    band_hz = np.array(ROOM_T60_S)[:, 0]
    tails = []
    for spectrum in rfft(rng.standard_normal((2, SR))):
        tail = np.zeros(SR)
        for own_band, (_, t60_s) in zip(np.eye(len(ROOM_T60_S)), ROOM_T60_S):
            share = across(np.c_[band_hz, own_band], hz)
            tail += irfft(spectrum * share, SR) * np.exp(-np.log(1000) * t / t60_s)
        tail = tail * (1 - np.exp(-(t / build_s) ** 2))
        tails.append(colour(tail / np.linalg.norm(tail), ROOM_COLOUR_DB))
    mid = signal.fftconvolve(x, tails[0])[:N]
    side = signal.fftconvolve(x, colour(tails[1], ROOM_SIDE_DB))[:N]
    return np.array([mid + side, mid - side])


# Microphone treble response straight ahead. Each row: frequency in Hz, level in dB.
FRONT_COLOUR_DB = [(6000, -1), (9500, -8), (12500, -7), (15000, -13)]


def scene():
    """Place the sources left, right and in front; add early bounces, echo and background."""
    tones, noise, shake = drill()
    jig, board = jig_clatter(), board_knocks()
    # Each row: sound, send to the room in dB.
    at_left = [(tones, -21), (noise, -6), (shake, -12), (brake_clack(), -10), (chuck_taps(), -7)]
    at_right = [(lever_chinks(), -6), (clamp_snap(), -6)]
    in_front = [(bench_thumps(), -4), (jig, -5), (rattle(), -4), (board, -7),
                (sympathy(jig + board), -14), (bench_slides() + finger_strokes(), -5)]
    left, right, front = (sum(x for x, _ in group) for group in (at_left, at_right, in_front))
    echo = sum(x * undb(room_db) for x, room_db in at_left + at_right + in_front)
    front = colour(front, FRONT_COLOUR_DB)
    early = glance(front + right, level_db=-8, decay_s=.004) + glance(left, level_db=-7, decay_s=.025)
    direct = ports(left, leftness=0.91) + ports(right, leftness=-0.68) + front
    return direct + early + workshop(echo) + background()


def record(dry, top_hz=15500):
    """Clip peaks at full scale, then cut everything above top_hz with a steep low-pass."""
    low_pass = signal.ellip(8, .2, 70, top_hz, fs=SR, output="sos")
    return signal.sosfilt(low_pass, np.clip(dry, -1, 1))


dry = scene()
out = record(dry)
digitize_waveform(out)
```